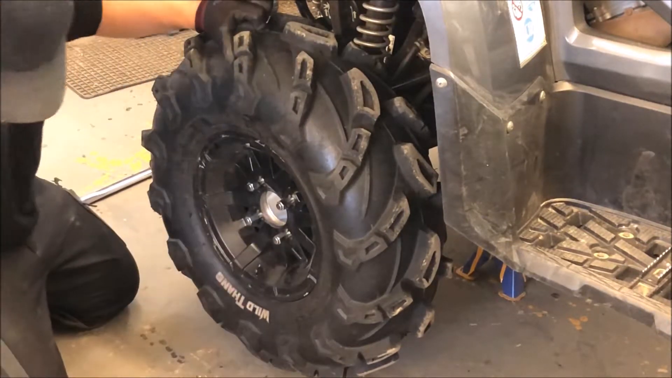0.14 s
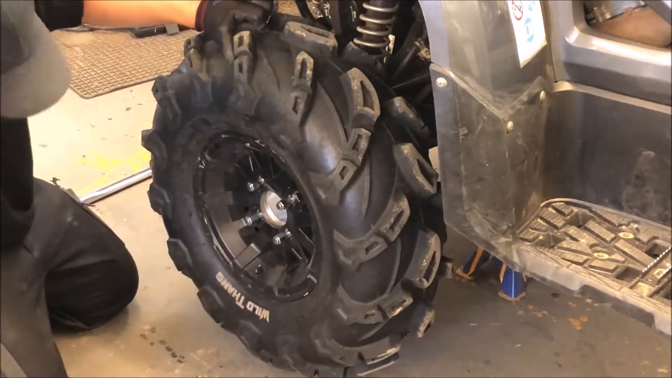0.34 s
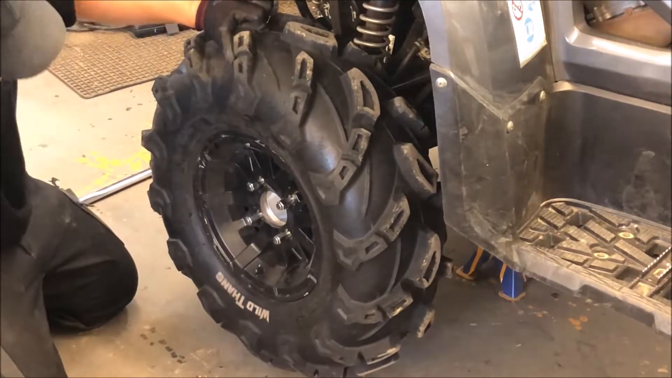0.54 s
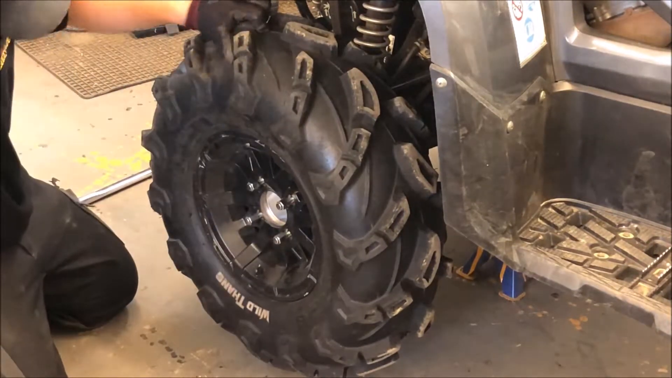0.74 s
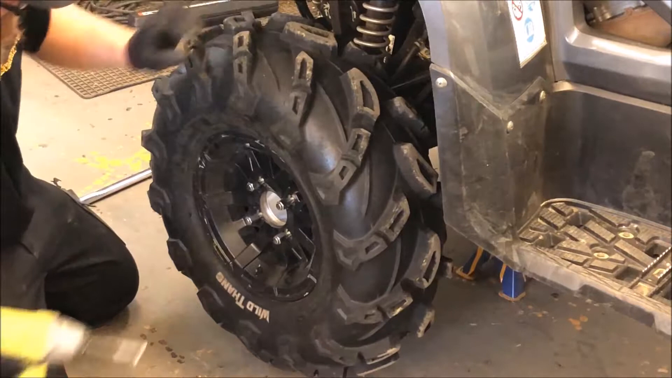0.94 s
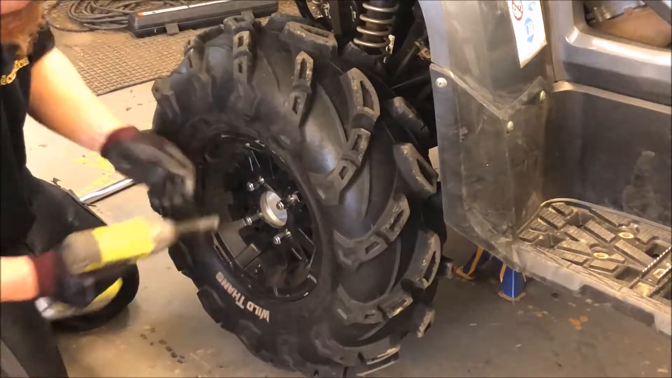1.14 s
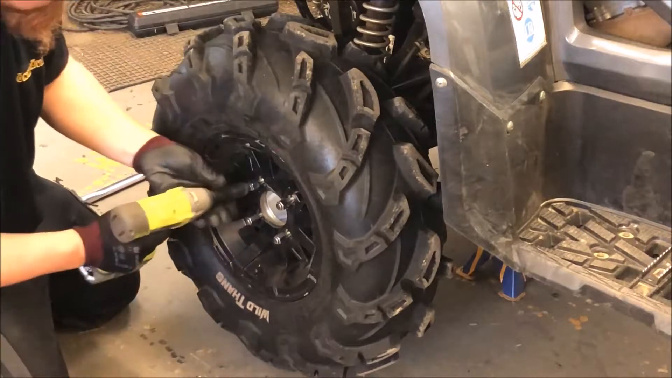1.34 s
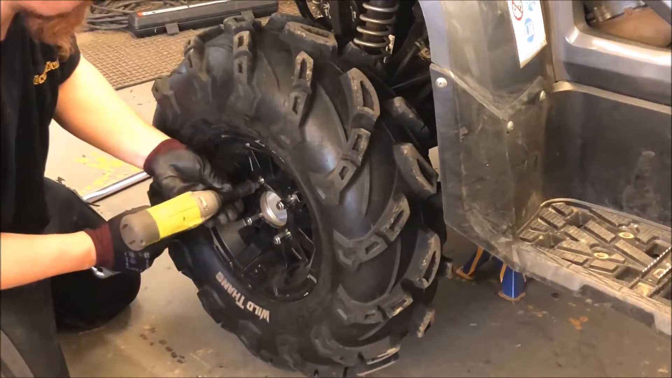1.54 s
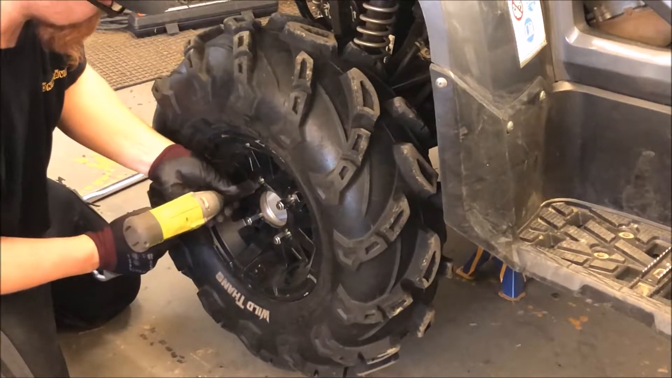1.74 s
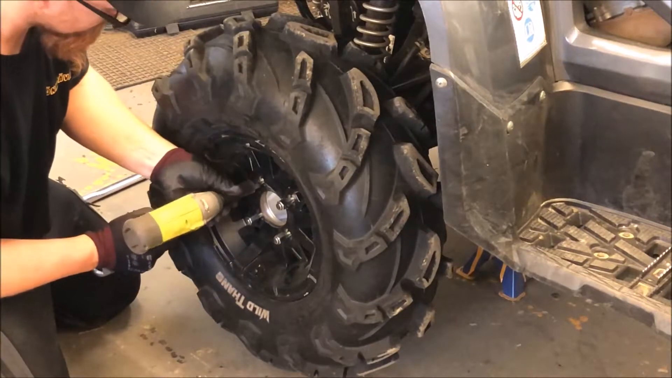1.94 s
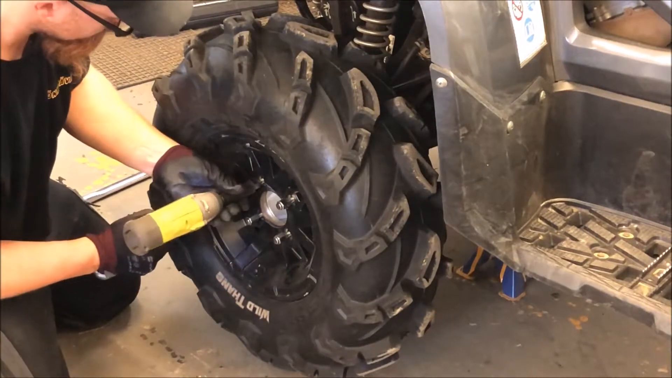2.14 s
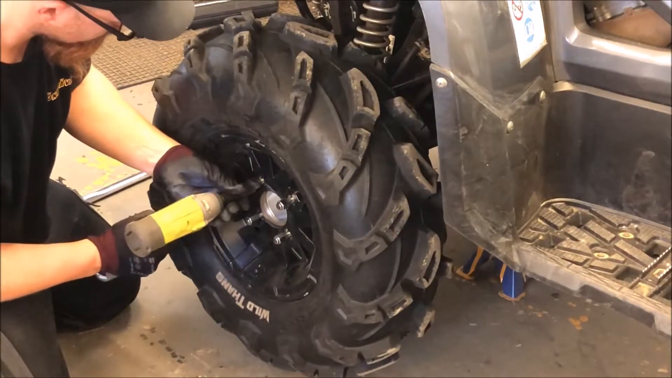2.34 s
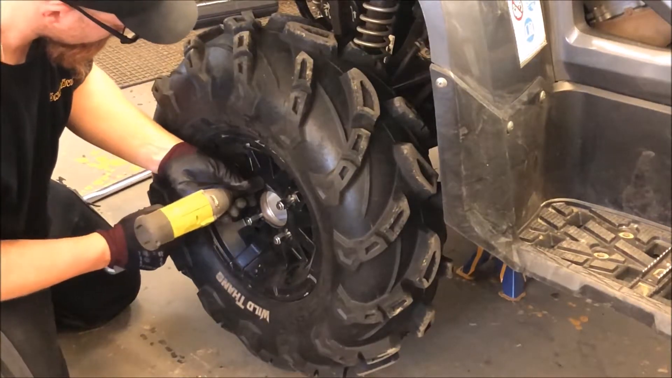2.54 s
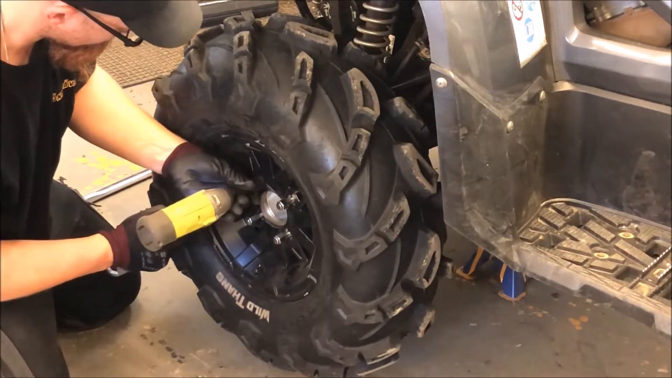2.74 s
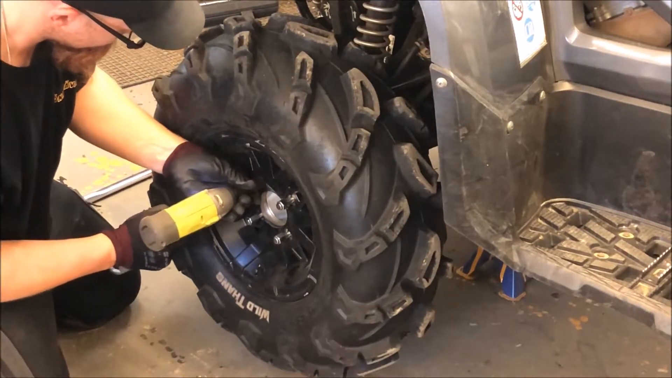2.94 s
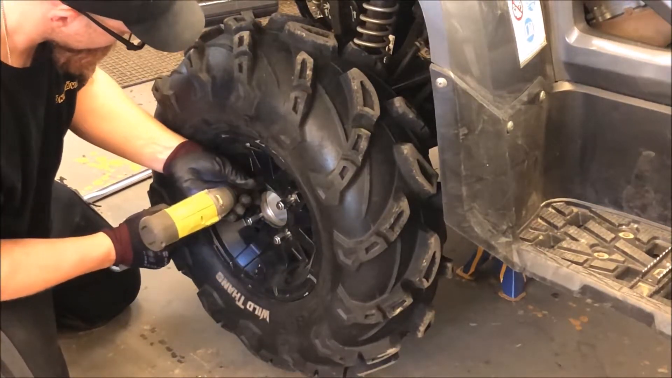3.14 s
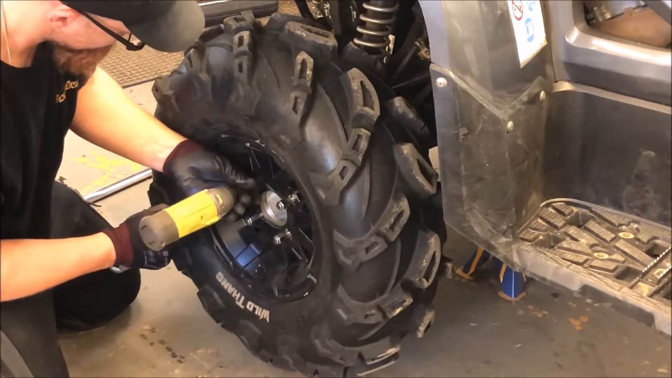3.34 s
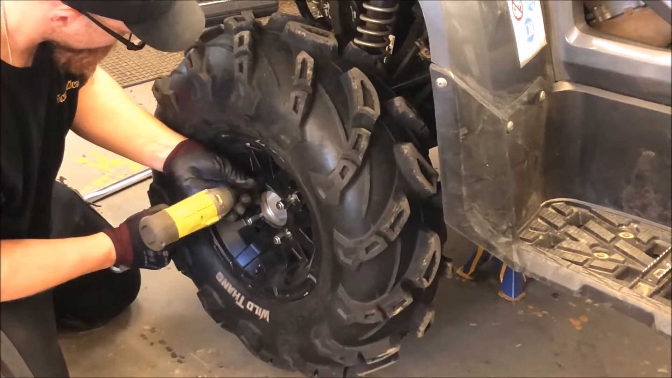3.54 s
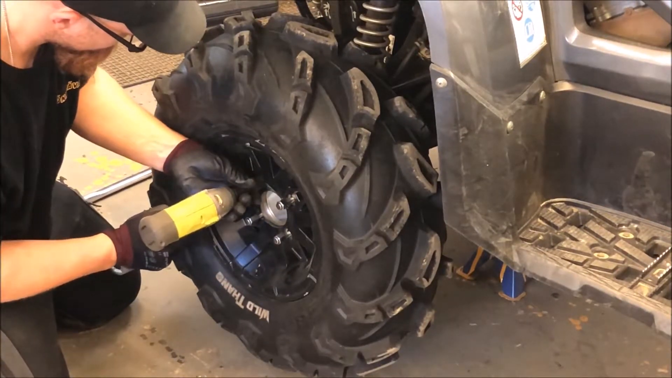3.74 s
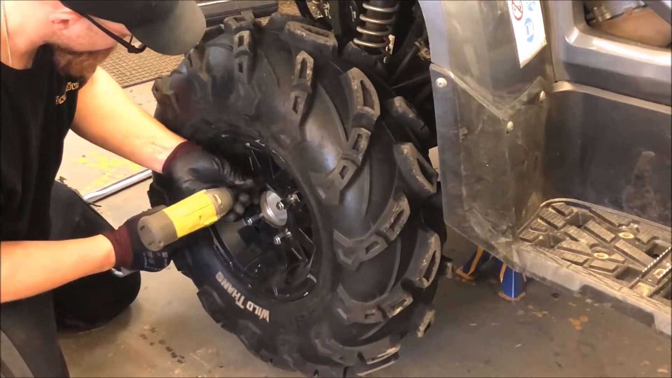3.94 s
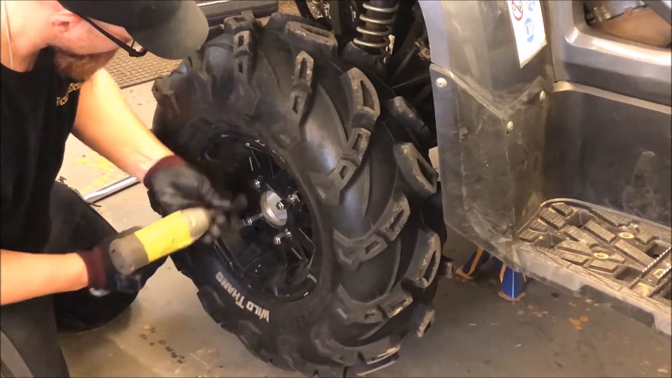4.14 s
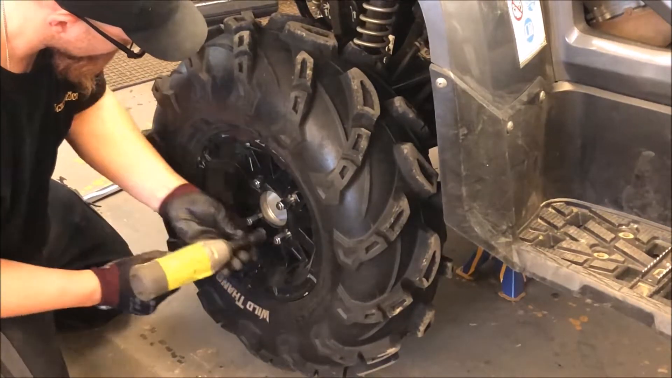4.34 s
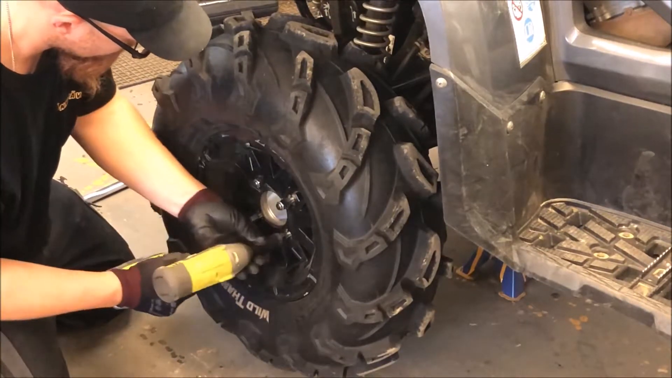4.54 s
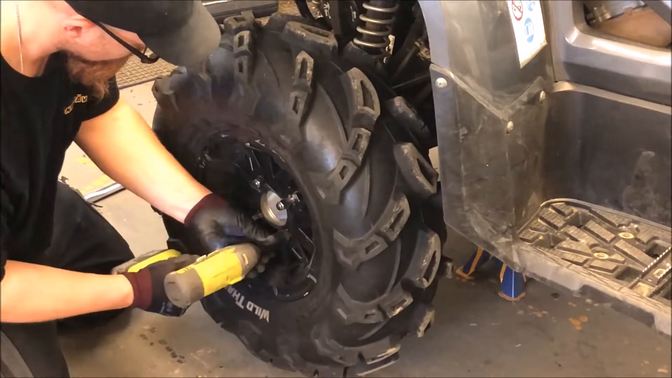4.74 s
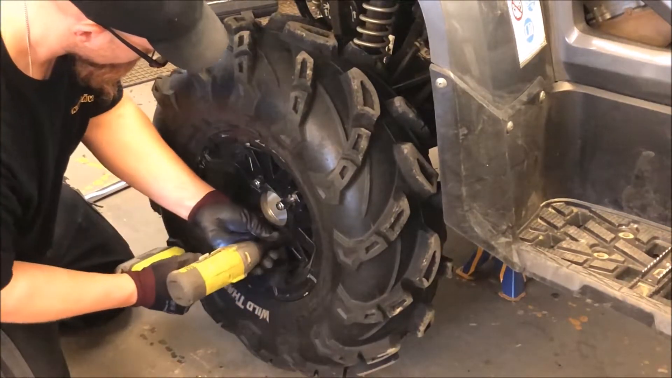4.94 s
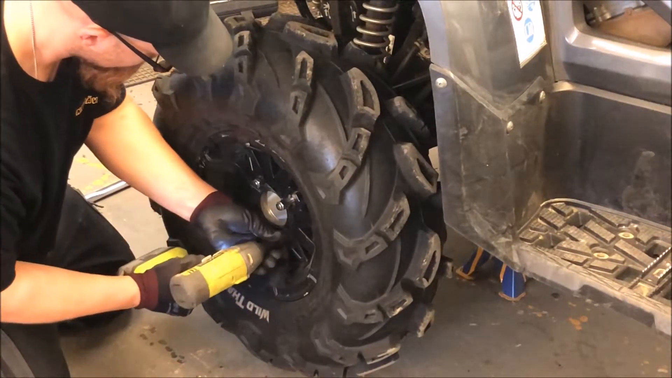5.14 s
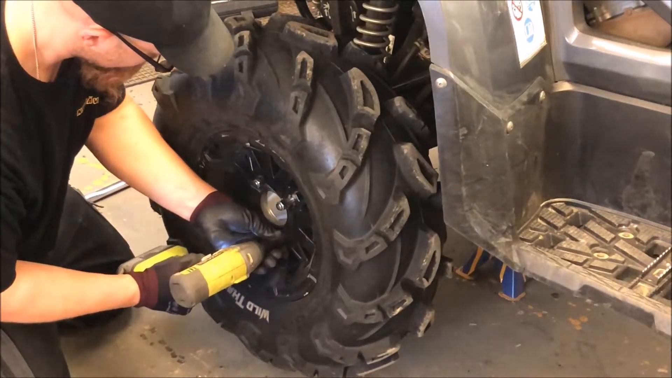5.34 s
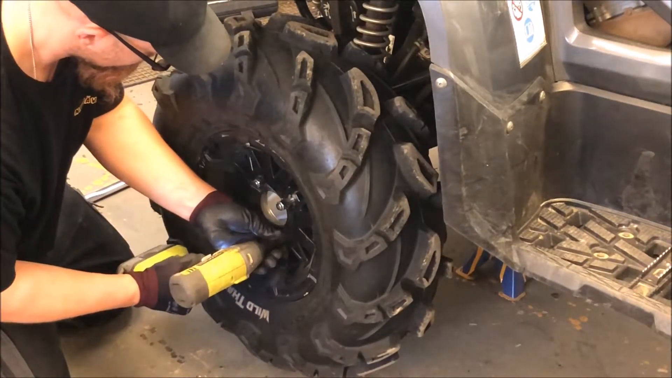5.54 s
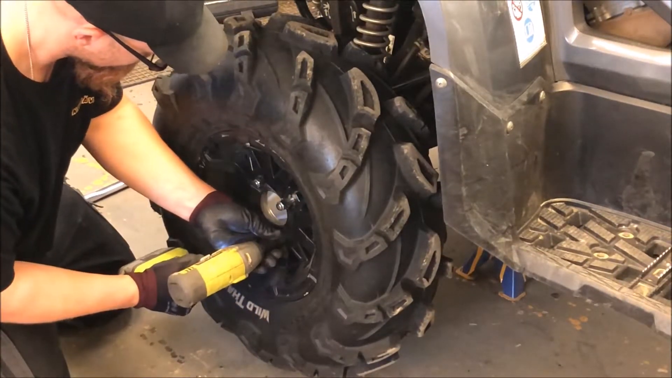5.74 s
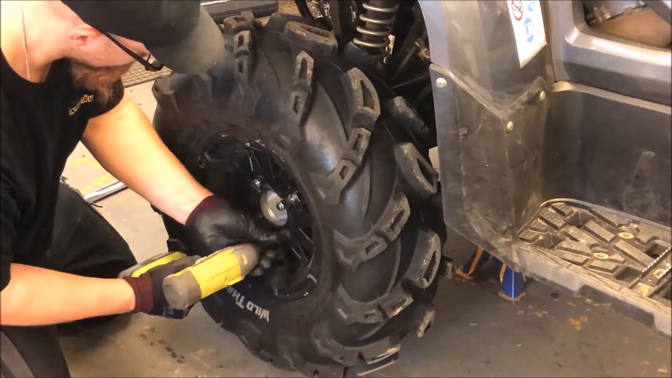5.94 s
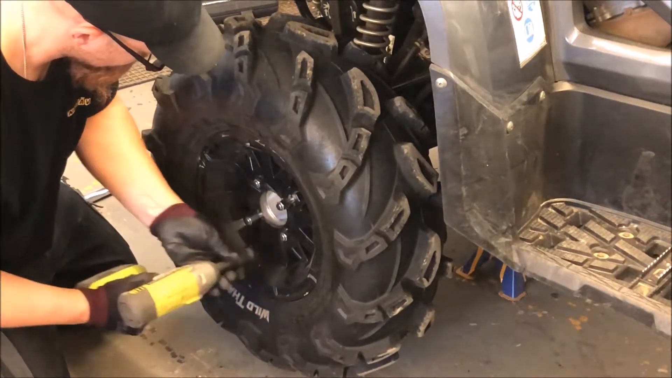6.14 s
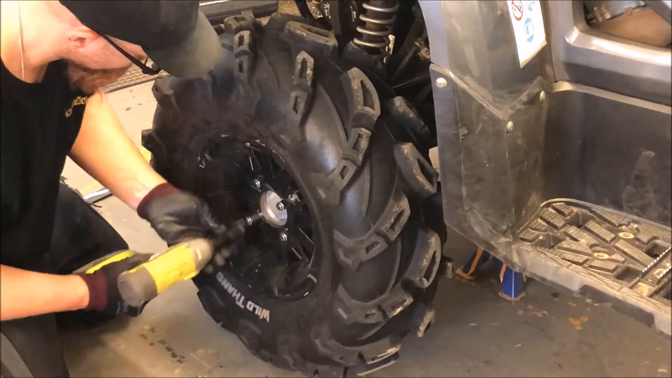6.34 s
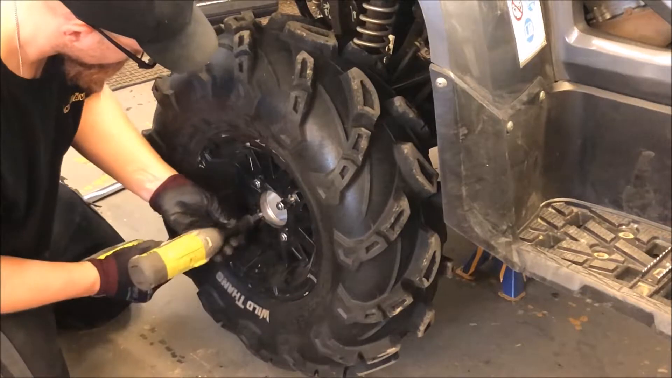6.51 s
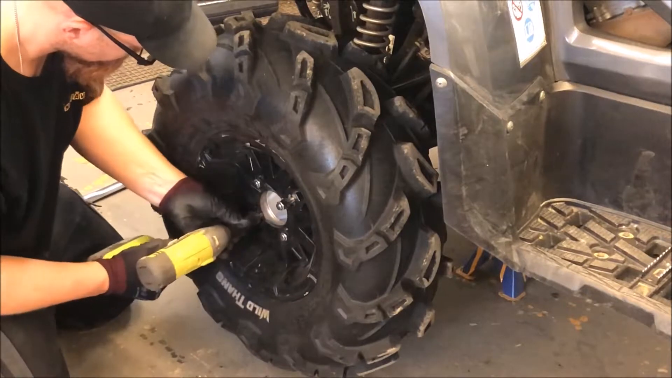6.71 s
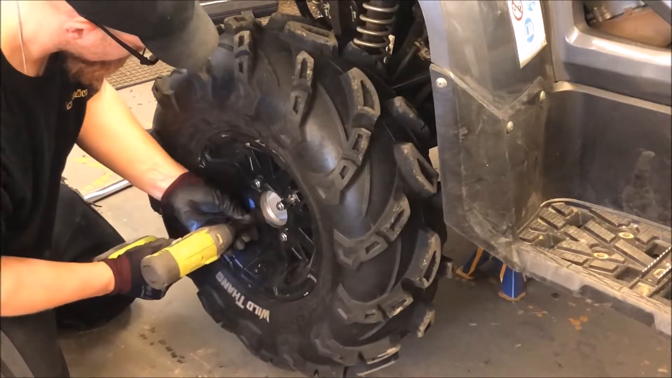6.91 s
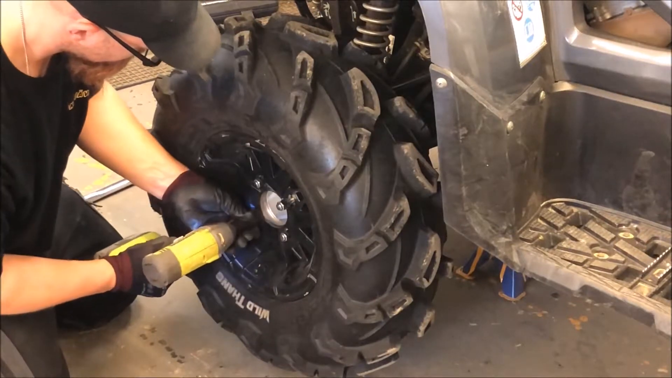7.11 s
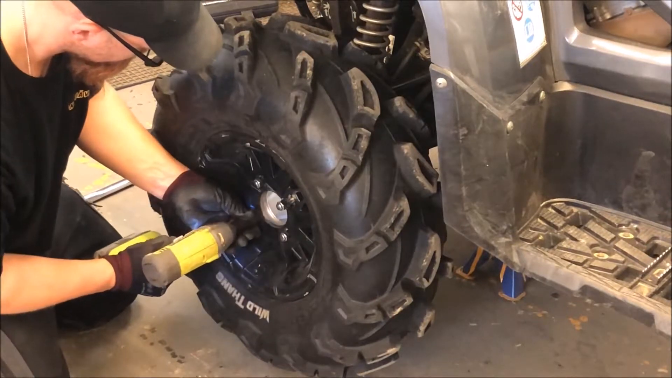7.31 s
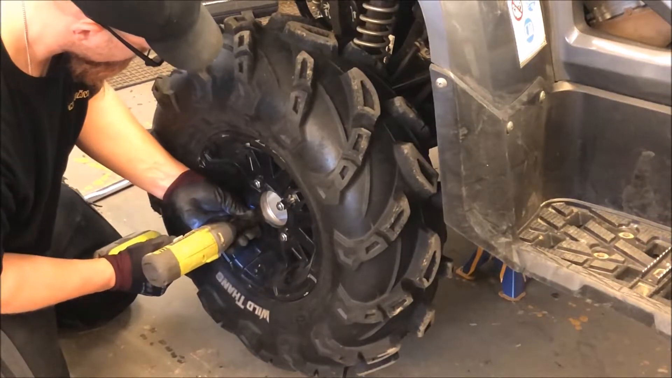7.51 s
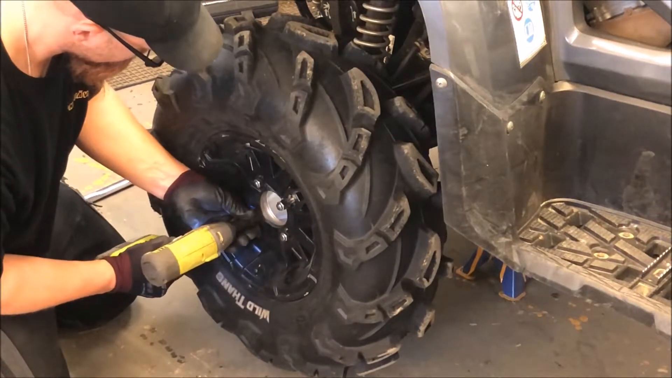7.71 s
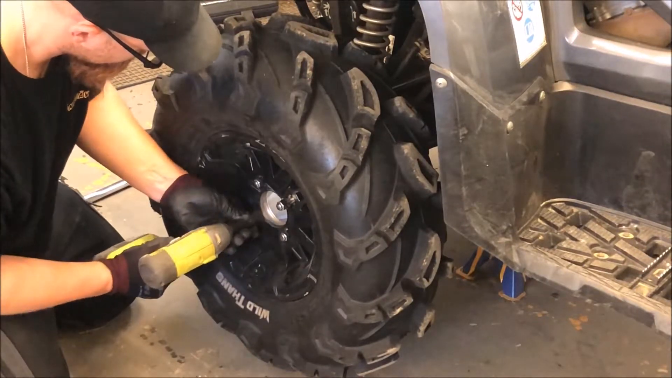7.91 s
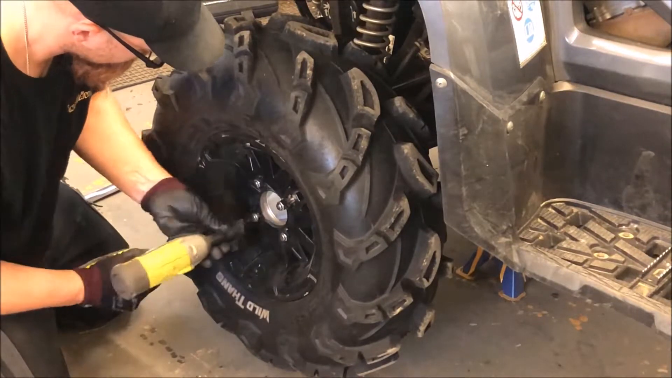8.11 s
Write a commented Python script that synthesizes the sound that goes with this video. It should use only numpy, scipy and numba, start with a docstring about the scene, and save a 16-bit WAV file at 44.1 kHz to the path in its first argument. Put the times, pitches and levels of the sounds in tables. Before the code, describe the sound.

After faint handling, an impact wrench clacks, spins and hammers three times, tightening wheel nuts in an echoing workshop.

```python
"""Gloves brush a tyre and light knocks touch a wheel, over the low rumble of a hard-walled workshop.
Then a cordless impact wrench does up three wheel nuts. Each time, the loose socket clacks and the
motor spins the nut down with a gritty whirr. Next the hammer inside the tool strikes about 33 times
a second, cracking through the steel socket while socket and wheel chatter. The room rings on."""
import sys
import numpy as np
from scipy import signal
from scipy.fft import rfft, irfft
from scipy.io import wavfile
from scipy.ndimage import uniform_filter1d
from numba import njit

SR = 44100
rng = np.random.default_rng(int(sys.argv[2]) if len(sys.argv) > 2 else 0)


def generate_wav(sig):
    """Save sig (samples, or channels by samples) to the path in sys.argv[1] as 16-bit PCM at SR."""
    pcm = np.round(np.clip(np.atleast_2d(sig).T, -1, 1) * 32767).astype(np.int16)
    wavfile.write(sys.argv[1], SR, pcm)


N = 360297
T = np.arange(N) / SR

# Levels in the tables are relative: each sound's function sets its overall loudness.
# gloves and clothes stroking the tyre: (start [s], level [dB], fade [s])
GLOVE_STROKES = [(-.02, -52, 0.026), (0.341, -53.5, 0.09), (.52, -60, .08), (.82, -61, .06),
                 (.98, -63, 0.074), (2.06, -59.5, .05), (2.28, -44.5, 0.033), (6.849, -40, 0.018)]
# glancing touches on wheel and socket: (time [s], pitch [Hz], level [dB], sharpness [Q], fade [s])
GLANCING_TOUCHES = [(0.512, 1940, -60, 8, .006), (0.531, 490, -60.5, 8.8, 0.037),
                    (1.096, 3040, -55, 5.1, .006), (1.468, 3680, -51.5, 16, 0.02),
                    (6.691, 2660, -47, 2.2, .005)]
# socket and gloves knocking on the wheel: (time [s], level [dB], extra treble [dB], extra thud [dB])
WHEEL_KNOCKS = [(0.615, -44.5, -4.5, -21), (1.099, -48, -9.5, -14), (1.468, -52, 4.5, 6.5),
                (1.721, -49, 1, -4.5), (2.614, -41.5, -11, -19), (4.513, -33, -7, -2),
                (4.561, -40, 1.5, -9.5), (4.615, -36, -13.5, -16), (4.805, -47, -4, -5), (6.472, -35, 1, 1),
                (6.83, -47.5, -6, 3)]
# tones of the motor drive at the first touch of the trigger: (pitch [Hz], level [dB])
WHISTLE_TONES = [(7430, -86), (14980, -93)]
# the socket snapping on anvil and nut: (time [s], level [dB], extra treble [dB], sticking before it [s])
SOCKET_CLACKS = [(2.287, -33.5, -22, 0.0074), (2.321, -20, -1.5, 0.0025), (2.864, -21, -11, 0.0012),
                 (2.879, -24.5, -9, .012), (4.847, -15, -2.5, 0.0043), (4.926, -20, -7, 0.0053),
                 (5.002, -11.5, -8, .022), (5.169, -16.5, 0, 0.00084), (5.312, -11, -5, 0.028),
                 (5.376, -9.5, -7.5, 0.035), (5.481, -11.5, -6, 0.022), (5.584, -27, 7, 0),
                 (6.875, -16, -2.5, 0), (6.928, -20.5, -7, 0.0078), (6.954, -17.5, -1, 0.028)]
# pulls of the trigger: (start [s], stop [s], first speed [turns/s], target speed [turns/s],
# gears [dB], hiss [dB], thread rumble [dB], change of friction over the pull [dB])
TRIGGER_PULLS = [(2.32, 2.46, 110, 80.6, -49, -48.5, -63, 1),
                 (2.651, 3.63, 74.64, 244.5, -42.5, -43.5, -40.5, -1),
                 (4.85, 5.61, 172, 184.3, -38, -39, -47, 0), (6.87, 7.56, 190, 203, -39.5, -40.5, -49, -6)]
# the socket ringing as it rubs on the first nut: (pitch [Hz], wander [Hz], level [dB])
SINGING_TONES = [(3250, 110, -58), (5370, 90, -63.5), (10800, 220, -64), (14800, 300, -56)]
# single blows as the nut seats and the hammer first catches: (time [s], level [dB])
FIRST_CATCHES = [(3.633, -25.5), (3.641, -16.5), (3.66, -12), (3.69, -12), (5.622, -14.5), (7.571, -14)]
# hammering, one burst a nut: (first blow [s], last blow [s], blows [count], blow level [dB],
# chatter level [dB], stray contact compared with its blow [dB], spread of stray contacts [s])
HAMMER_BURSTS = [(3.704, 3.964, 8, -13, -21, -0.5, .026), (5.632, 5.921, 11, -11, -22.5, -11, .006),
                 (7.579, 7.93, 13, -11.5, -24.5, -12, 0.0035)]

# pitches at which each part likes to ring: (pitch [Hz], width [Hz], boost [dB])
SOCKET_RING = [(3047, 830, 5.5), (6940, 980, 4.5), (10670, 650, 4)]
WHEEL_RING = [(175, 36, 8.1), (369, 53, 7.3), (628, 79, 8.6), (735, 85, 8.1), (1241, 52, 10.3),
              (1690, 460, 2.6), (3594, 260, 8.8), (4530, 670, 9.4)]
GEARBOX_RING = [(745, 87, 5.9), (3270, 230, 3), (4720, 240, 3.3), (7100, 460, 1.8), (10800, 440, 2),
                (15000, 1200, 2.2)]
RIM_RING = [(318, 260, 2.4), (474, 95, 1)]
# each sound's balance from bass to treble: (frequency [Hz], level [dB])
RUB_BALANCE = [(100, -7), (500, 3), (900, 0.5), (1550, 5.5), (7000, 2), (16000, -9)]
SHOP_BALANCE = [(15, -46), (25, -19.5), (92, 0), (285, -1), (988, -14.5), (3920, -15), (16000, -29.5)]
KNOCK_BALANCE = [(100, -15), (1500, 1.5), (3000, -0.5), (10000, -6.5), (16000, -22.5)]
THUD_BALANCE = [(40, -25), (100, -11), (200, 1), (1200, -4), (3000, -32)]
CLACK_BALANCE = [(80, -32), (500, -8.5), (1600, 1), (3000, 2), (5500, -3.5), (8500, 1), (12500, -6.5),
                 (16000, -9)]
GEAR_BALANCE = [(80, -23), (400, 1.5), (4500, -0.5), (7000, -8), (12000, -19)]
HISS_BALANCE = [(2000, -16), (5000, -3.5), (8000, -0.5), (10000, -1.5), (12500, -4.5), (16000, -2)]
RUMBLE_BALANCE = [(25, -37), (60, -10.5), (120, -10.5), (168, 3.5), (450, -6), (2000, -41.5)]
BLOW_BALANCE = [(60, -26.5), (200, -11.5), (1600, 3), (3000, -1), (5500, -2), (9000, -2.5), (12500, -7),
                (16000, -11)]
CHATTER_BALANCE = [(40, -36.5), (200, -6), (1000, -6.5), (1800, 3), (3000, -2), (5500, -9.5), (8000, -5.5),
                   (12500, -12), (16000, -11)]
# how long the workshop echoes: (frequency [Hz], time to fade by 60 dB [s])
ECHO_TIMES = [(100, 1.05), (700, 0.85), (4000, .76), (9000, 0.56), (14000, 0.42)]


def undb(db):
    """Turn decibels into a number to multiply by."""
    return 10 ** (np.asarray(db) / 20)


def unit(x):
    """Scale a sound to an average power of 1."""
    return x / np.sqrt(np.mean(x ** 2))


def along(hz, points):
    """Read between (frequency [Hz], value) points, with octaves evenly spaced."""
    f, value = np.transpose(points)
    return np.interp(np.log(hz + 1), np.log(f), value)


def colour(x, balance, rings=(), size=8192):
    """Give a sound a balance of bass and treble, and boost the pitches where a part rings."""
    hz = np.fft.rfftfreq(size, 1 / SR)
    gain = undb(along(hz, balance))
    for f, width, db in rings:
        gain = gain * undb(db / (1 + (2 * (hz - f) / width) ** 2))
    # shape the filter so that it rings only after a hit, never before
    cepstrum = irfft(np.log(unit(gain)))
    cepstrum[1:size // 2] *= 2
    cepstrum[size // 2 + 1:] = 0
    response = irfft(np.exp(rfft(cepstrum)))[:size // 2]
    return signal.oaconvolve(x, response)[:N]


def walk(rate):
    """A random drift of size about 1 that changes course `rate` times a second."""
    knots = rng.standard_normal(4000)
    return 1.184 * np.interp(T * rate, np.arange(len(knots)), knots)


def grit(spread_db):
    """A crowd of tiny contacts: noise whose strength jumps every 32 samples."""
    sizes = np.repeat(rng.standard_normal(N // 32 + 1), 32)[:N]
    return unit(rng.standard_normal(N) * undb(spread_db * sizes))


def strikes(times, dbs, hold_s, fade_s):
    """Loudness curve of hits that start at once, hold for a moment and die away."""
    power, t = np.zeros(N + SR), np.arange(SR // 5) / SR
    shape = np.exp(-np.maximum(t - hold_s, 0) / fade_s)
    for s, db in zip(times, dbs):
        i = int(s * SR)
        power[i:i + len(t)] += (undb(db) * shape) ** 2
    return np.sqrt(power[:N])


def swells(rows):
    """Loudness curve of rounded bursts: (start [s], level [dB], length [s])."""
    power = np.zeros(N + SR)
    for s, db, length in rows:
        i, n = int(s * SR), int(length * SR) + 2
        power[i:i + n] += undb(db) ** 2 * signal.windows.tukey(n, 2 / 3)
    return np.sqrt(power[:N])


def contacts(s, db, treble_db, hold_s, fade_s, split_hz=1300):
    """Short noisy hits, each with its own loudness and brightness."""
    noise = rng.standard_normal(N)
    low = signal.sosfilt(signal.butter(1, split_hz, fs=SR, output="sos"), noise)
    high = noise - low
    return low * strikes(s, db, hold_s, fade_s) + high * strikes(s, db + treble_db, hold_s, fade_s)


def tone(hz, wander_hz, rate):
    """A tone whose pitch wanders."""
    return np.sqrt(2) * np.sin(2 * np.pi * np.cumsum(hz + wander_hz * walk(rate)) / SR)


def rubs(attack_s=0.013):
    """Gloves drag unevenly over rubber: each stroke takes hold quickly and trails off."""
    strokes = np.zeros(N)
    for s, db, fade_s in GLOVE_STROKES:
        rise = np.clip((T - s) / attack_s, 0, 1)
        fall = np.exp(-np.maximum(T - s - attack_s, 0) / fade_s)
        strokes += undb(db) * rise * fall
    return strokes * undb(2 * walk(45.8) - 7.5) * colour(grit(spread_db=5), RUB_BALANCE)


def shop_air():
    """The workshop's faint, low background noise drifts a little in level."""
    return undb(-72.5 + .5 * walk(1.5)) * colour(rng.standard_normal(N), SHOP_BALANCE)


def pings():
    """A part that is only grazed rings briefly at one pitch."""
    clinks = np.zeros(N)
    for s, hz, db, sharpness, fade_s in GLANCING_TOUCHES:
        ring = unit(signal.lfilter(*signal.iirpeak(hz, sharpness, SR), rng.standard_normal(N)))
        clinks += strikes([s], [db], hold_s=0.0018, fade_s=fade_s) * ring
    return undb(0.5) * clinks


def knocks():
    """Light knocks on the wheel: a tick, and a duller thud of rim and tyre."""
    s, db, treble_db, thud_db = np.transpose(WHEEL_KNOCKS)
    tick = colour(contacts(s, db, treble_db, hold_s=0.0042, fade_s=0.0015), KNOCK_BALANCE, RIM_RING)
    shake = strikes(s, db + thud_db, hold_s=0.0013, fade_s=0.094) * rng.standard_normal(N)
    thud = colour(shake, THUD_BALANCE, RIM_RING)
    return undb(1) * tick + undb(-10.5) * thud


def whistle(start_s=2.07, length_s=0.3):
    """The drive whistles as it switches current through the motor before it turns."""
    tones = sum(undb(db) * tone(hz, wander_hz=25, rate=140) for hz, db in WHISTLE_TONES)
    return swells([(start_s, 11, length_s)]) * tones


def judders(share_of_sticking=0.58):
    """A sticking nut makes the socket clink in a short burst before it snaps free."""
    bursts = [(s - stick_s, db - 15, share_of_sticking * stick_s)
              for s, db, _, stick_s in SOCKET_CLACKS if stick_s > 0]
    clinks = swells(bursts) * grit(spread_db=1.5)
    return undb(-2) * colour(clinks, CHATTER_BALANCE, rings=[(4590, 600, 13.8)])


def clacks():
    """The loose socket takes up its slack with a short, bright snap."""
    s, db, treble_db, _ = np.transpose(SOCKET_CLACKS)
    snaps = contacts(s, db, treble_db, hold_s=0.0016, fade_s=0.0025)
    return undb(-3.5) * colour(snaps, CLACK_BALANCE, SOCKET_RING)


def drive(ease_s=0.57):
    """Each trigger pull eases the motor towards a target speed; the faster it turns, the louder it is."""
    speed, gains = np.zeros(N), np.zeros((3, N))
    for start, stop, first, target, gear_db, hiss_db, rumble_db, change_db in TRIGGER_PULLS:
        held = (T > start) & (T < stop)
        age = T[held] - start
        speed[held] = target + (first - target) * np.exp(-age / ease_s)
        doublings = np.log2(speed[held] / target)
        friction_db = change_db * age / (stop - start)
        gains[:, held] = undb([gear_db + 3.5 * doublings + friction_db,
                               hiss_db + 2.5 * doublings,
                               rumble_db + 9.5 * doublings + friction_db])
    return speed, uniform_filter1d(gains, SR // 100)


def motor(gear_ratio=8.3):
    """Gears whine, and grind and hiss harder once each socket turn; the nut rumbles down its thread."""
    speed, (gear_gain, hiss_gain, rumble_gain) = drive()
    angle = 2 * np.pi * np.cumsum(speed * (1 + 0.0054 * walk(40))) / SR
    socket_turn = undb(2.2 * np.sin(angle / gear_ratio))
    wobble = socket_turn * undb(2.03 * walk(70) + 0.6 * np.sin(angle))
    grind = colour(grit(spread_db=3.5) * wobble, GEAR_BALANCE, GEARBOX_RING)
    hiss = colour(grit(spread_db=4) * wobble, HISS_BALANCE, GEARBOX_RING)
    # meshing teeth whine at multiples of the motor speed
    whine = undb(-12) * sum(np.sin(k * angle) * undb(3 * walk(20)) for k in (8, 12, 16))
    rumble = colour(rng.standard_normal(N), RUMBLE_BALANCE)
    hum = undb(-10) * np.sin(angle) * undb(2 * walk(18))
    gearbox = gear_gain * (grind + whine) + hiss_gain * hiss
    return undb(-4) * gearbox + undb(-3.5) * rumble_gain * (rumble + hum)


def singing(start_s=3.02, length_s=.62):
    """Rubbing on the first nut keeps the spinning socket ringing."""
    tones = sum(undb(db + 2 * walk(30)) * tone(hz, wander, rate=560) for hz, wander, db in SINGING_TONES)
    return swells([(start_s, 0, length_s)]) ** .25 * tones


def blows(quickening=.09, tighten_s=0.11, release_s=.03, scatter_db=2, stray_lead_s=.007):
    """The hammer speeds up, bites harder as the nut tightens, and weakens as the trigger is let go."""
    rows = []
    for first, last, count, blow_db, chatter_db, stray_db, spread_s in HAMMER_BURSTS:
        progress = np.linspace(0, 1, count)
        s = first + (last - first) * (progress + quickening * progress * (1 - progress))
        slack = np.exp(-(s - first) / tighten_s)  # a nut that is not yet tight gives way
        release_db = -2.5 * np.exp(-(last - s) / release_s)
        chance_db = scatter_db * rng.standard_normal((len(s), 2))
        blow = blow_db - 6 * slack + release_db + chance_db[:, 0]
        rattle = chatter_db - 6.5 * slack + release_db + chance_db[:, 1]
        stray_s = s - stray_lead_s - spread_s * rng.random(len(s))
        rows += list(np.column_stack([s, blow, rattle, stray_s, blow + stray_db]))
    return np.array(rows)  # (time [s], blow [dB], chatter [dB], stray time [s], stray level [dB])


def hammer():
    """Each blow on the anvil cracks through the steel socket, whose looseness adds stray contacts."""
    s, db, _, stray_s, stray_db = blows().T
    catch_s, catch_db = np.transpose(FIRST_CATCHES)
    force = strikes(np.r_[s, stray_s, catch_s], np.r_[db, stray_db, catch_db],
                    hold_s=0.002, fade_s=0.0036)
    return undb(1) * colour(force * rng.standard_normal(N), BLOW_BALANCE, SOCKET_RING)


def chatter(lead_s=.0165, length_s=.021):
    """As the hammer winds up for each blow, socket and stud rattle the wheel."""
    bursts = [(s - lead_s, db, length_s) for s, _, db, _, _ in blows()]
    return undb(6) * colour(swells(bursts) * grit(spread_db=1), CHATTER_BALANCE, WHEEL_RING)


def room(x, early_db=-2):
    """The workshop's echo: quick bounces off wheel and floor, and a wash whose treble dies first."""
    t = np.arange(SR * 5 // 4) / SR
    hz, frame_s, cells = signal.stft(rng.standard_normal(len(t)), SR, nperseg=256)
    fade = np.exp(-np.log(1000) * frame_s / along(hz, ECHO_TIMES)[:, None])
    wash = signal.istft(cells * fade, SR)[1][:len(t)]
    build_up = 1 - np.exp(-t / 0.0047)
    early_boost = 1 + undb(early_db) * np.exp(-t / 0.013)
    echo = wash * build_up * early_boost
    return signal.oaconvolve(x, echo / np.sqrt(np.sum(echo ** 2)))[:N]


@njit
def follow(x, attack_s, release_s):
    """Track the level of a sound: quick to rise, slow to fall."""
    out, level = np.empty(len(x)), 0.
    for i in range(len(x)):
        lag_s = attack_s if abs(x[i]) > level else release_s
        level += (abs(x[i]) - level) / (SR * lag_s)
        out[i] = level
    return out


def scene():
    """Tool, socket and wheel are each heard directly and with their own share of echo."""
    # (sound, echo level [dB])
    sources = [(hammer(), -4.5), (chatter(), -6), (clacks(), -5), (knocks() + pings() + rubs(), 1),
               (motor() + singing() + judders(), -3), (whistle(), -12)]
    work = sum(sound + room(sound * undb(echo_db)) for sound, echo_db in sources)
    return (work + shop_air())[None]


def record(dry, limit_db=-13, ceiling=.48, top_hz=15900):
    """Automatic volume holds loud blows down, then recovers; peaks are rounded, the top treble is cut."""
    level = follow(dry[0], attack_s=0.00096, release_s=0.054)
    gain = np.minimum(1, undb(limit_db) / (level + 1e-9))
    rounded = ceiling * np.tanh(gain * dry[0] / ceiling)
    treble_cut = signal.ellip(10, .2, 70, top_hz, fs=SR, output="sos")
    return signal.sosfilt(treble_cut, rounded)[None]


dry = scene()
out = record(dry)
generate_wav(out)
```